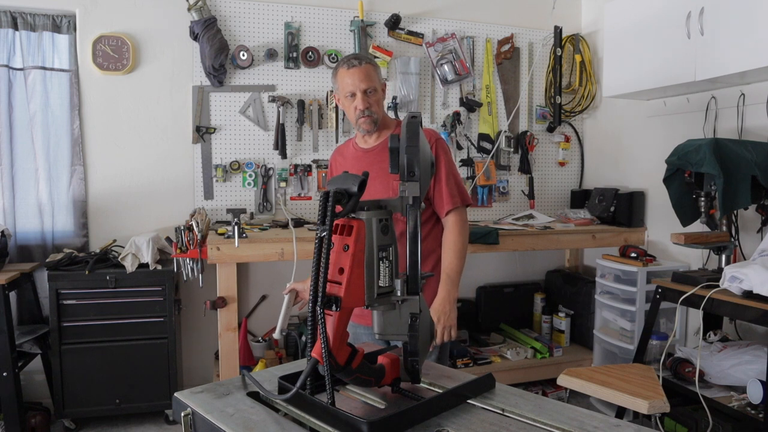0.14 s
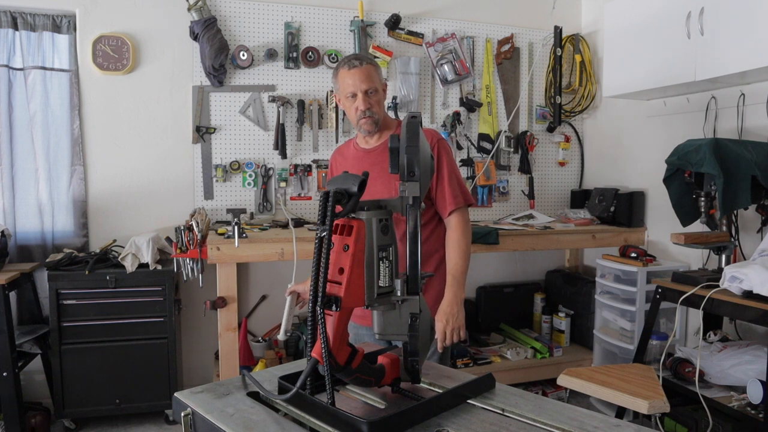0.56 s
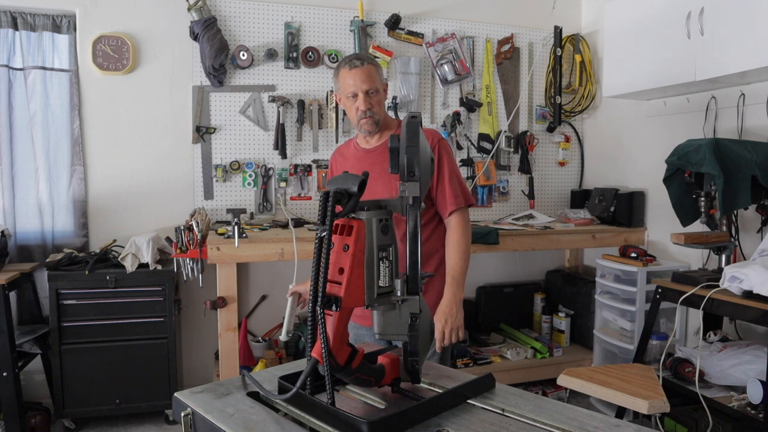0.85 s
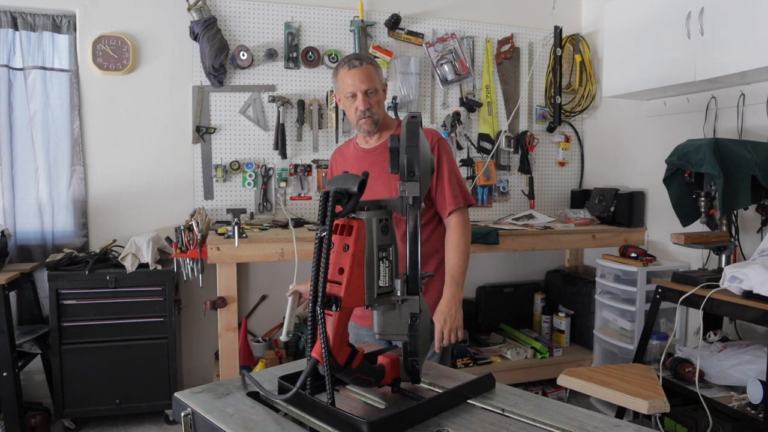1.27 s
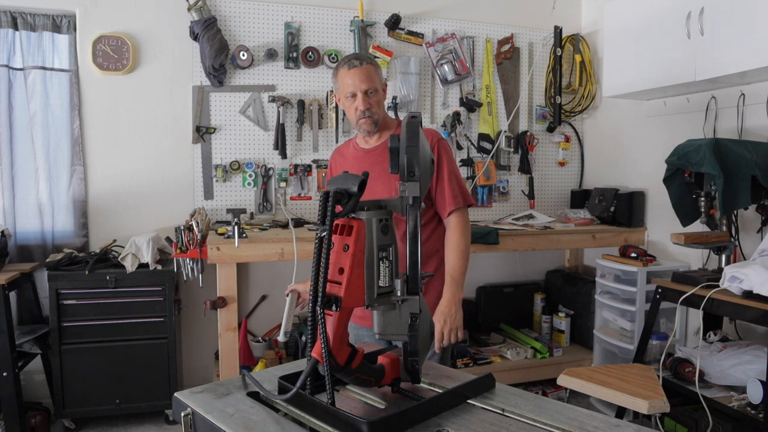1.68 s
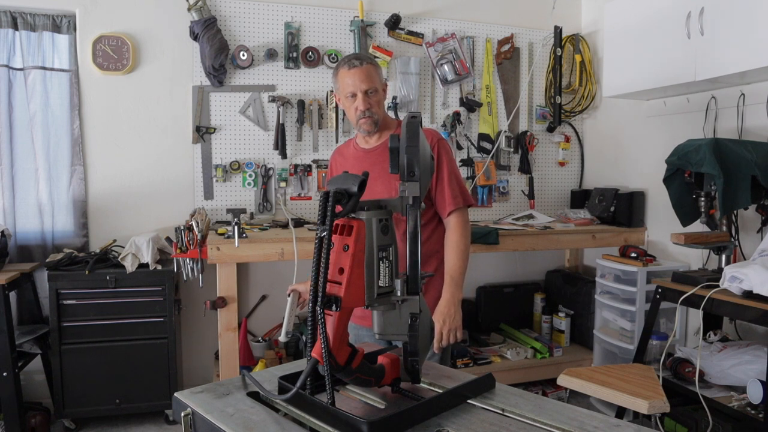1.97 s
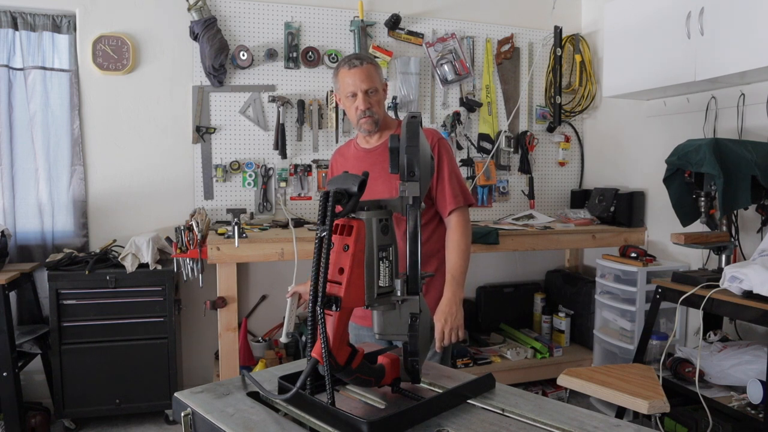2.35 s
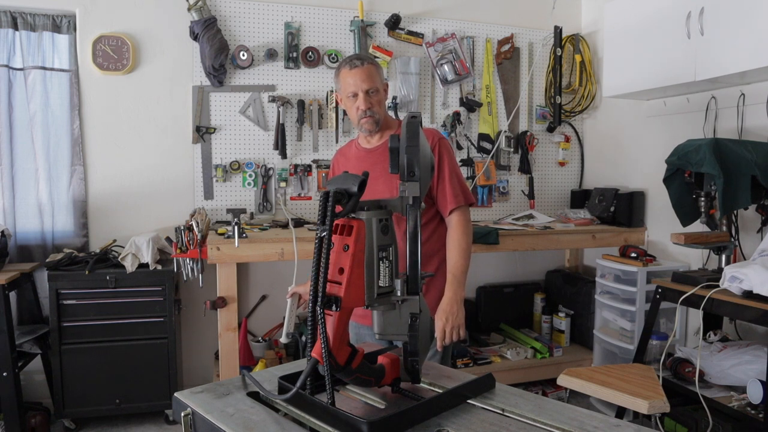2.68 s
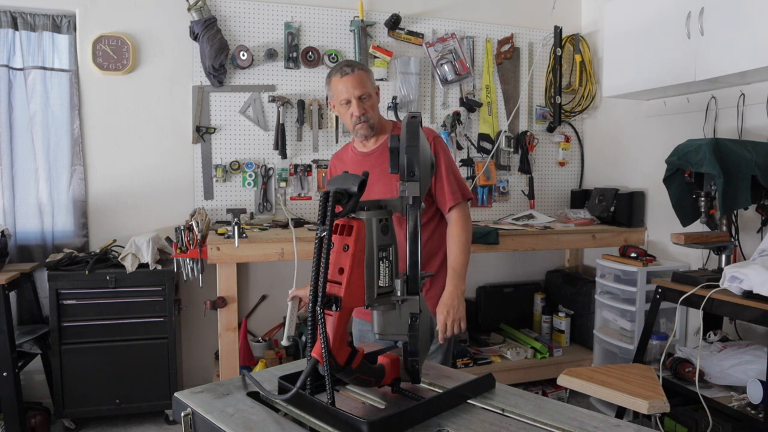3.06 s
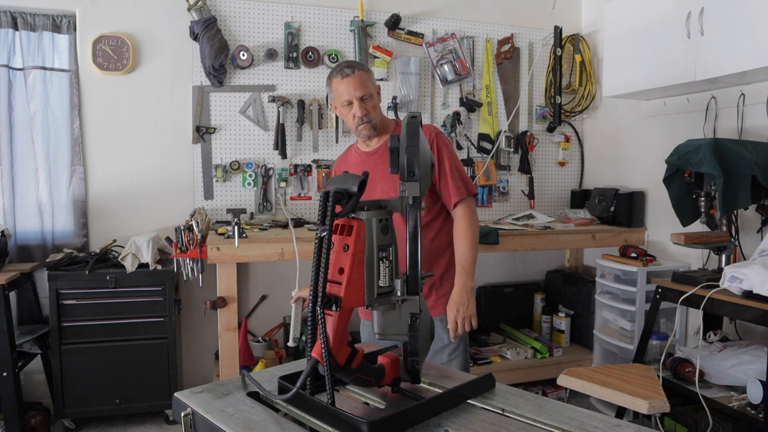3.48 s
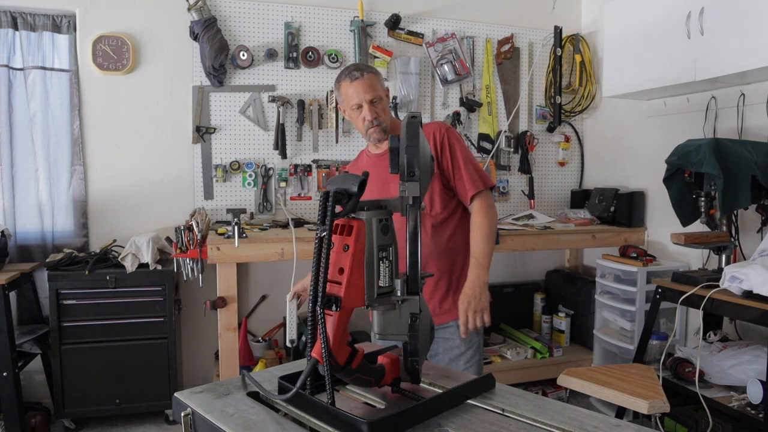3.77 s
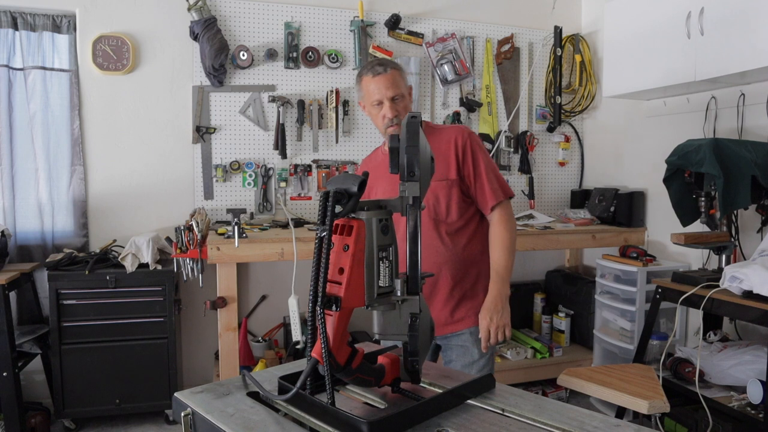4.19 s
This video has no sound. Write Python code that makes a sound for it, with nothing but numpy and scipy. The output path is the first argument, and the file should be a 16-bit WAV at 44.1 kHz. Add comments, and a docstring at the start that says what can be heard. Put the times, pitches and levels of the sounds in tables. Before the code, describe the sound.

A portable band saw is already running free, its electric motor whining upward over clattering gear teeth and a hiss. It is switched off almost at once and winds down with a falling pitch. The motor restarts abruptly, climbs for about a second, then is switched off and coasts to a halt again. Each stop ends with faint, thin squeaks. The microphone is a few metres away in a small workshop with a short echo.

```python
"""A small workshop, one microphone a few metres from a portable band saw on a steel stand.
The brushed motor is running up as we come in; it coasts to a stop, then starts and stops again.
Its shaft whines, most under power; gear teeth clatter into the housing; fan and brushes hiss.
The stand booms through the floor, and something squeaks as the wheels halt.
Behind the saw are a short room echo, faint air noise and mains hum."""
import sys
import numpy as np
from scipy import signal
from scipy.fft import rfft, irfft
from scipy.io import wavfile
from scipy.ndimage import uniform_filter1d

SR = 44100
rng = np.random.default_rng(int(sys.argv[2]) if len(sys.argv) > 2 else 0)


def digitize_waveform(pressure):
    """Quantize a signal to 16-bit integers and store it at the path in sys.argv[1].

    Rows of a 2-D input are taken as channels; values are limited to [-1, 1].
    """
    field = np.atleast_2d(pressure).T
    bounded = np.clip(field, -1, 1)
    quanta = np.round(bounded * 32767).astype(np.int16)
    wavfile.write(sys.argv[1], SR, quanta)


N = 191161
T = np.arange(N) / SR
DRAG_PER_S, ATTACK_S = 1.33, 0.078  # fan drag on the coasting shaft; onset of clatter and booms
TOP_HZ = 15650
# resonances of the saw's panels (frequency [Hz], width [Hz], gain [dB])
PANELS = [(242, 27, -6.5), (379, 29, -7), (468, 30, -10), (581, 40, -1.5), (648.5, 68, 5.5), (728, 49, -2),
          (834, 27, -1.5), (1402, 61, -5.5), (1520, 15, -14.5), (1635, 21, -15), (1726, 48, -5.5),
          (1873, 20, -5), (1942, 22, -8.5), (2037, 30, -9.5), (2232, 43, -5), (2355, 63, -0.5),
          (2676, 28, -2), (2926, 88, -6.5), (3154, 50, -5), (4034, 64, -8.5), (4090, 22, -7),
          (4486, 31, -11.5), (4724, 94, -6), (5040, 140, -6.5), (5600, 20, -26), (7235, 210, -2),
          (8370, 290, -2)]


def saw():
    """The saw up close: clatter rings housing, panels and stand, with whine on top and rumble below."""
    # spectrum of the housing (frequency [Hz], level [dB per Hz])
    housing = [(35, -78), (60, -46.5), (100, -25.5), (149, -26), (240, -14.5), (310, -13), (400, -9.5),
               (573, -9.5), (1100, -7), (2260, -3), (2540, -6.5), (2920, -2), (3440, -5), (4050, -3.5),
               (6010, -10.5), (8520, -13), (15600, -32.5)]
    # shifts in its colour (band [Hz], at half speed [dB], gears slack [dB], starting torque [dB])
    shifts = [(150, -6.5, -1, 5), (330, -15, -1, 1.5), (615, -7, 1, 8), (1090, -3, 13, 0.5),
              (1835, 3.5, -3, -3.5), (3000, -7, 1, 2), (3340, -7.5, 5, 2.5), (3970, 0, -0.5, -2),
              (6400, -4, -4, -1), (10000, -4, -8, 0), (14000, -7, 1, 0.5)]
    # resonances of the steel stand (frequency [Hz], width [Hz], gain [dB])
    stand_modes = [(570, 22, -14), (990, 40, 1), (1108, 58, 1), (1160, 27, -7), (1210, 19, -3),
                   (1660, 18, -2), (1930, 22, 4)]
    hz, slack = shaft()
    slow = 2 * np.minimum(1 - hz / hz.max(), .55)
    acceleration = uniform_filter1d(np.gradient(hz) * SR, size=4000)
    torque = np.clip(acceleration / 480, 0, 1) ** 2
    shake = clatter(hz)
    body = level(colour(shake + undb(3.0) * ring(shake, PANELS), housing), 1.41)
    bands = split(body, [row[0] for row in shifts])
    shell = sum(undb(slow_db * slow + slack_db * slack + torque_db * torque) * band
                for band, (_, slow_db, slack_db, torque_db) in zip(bands, shifts))
    stand = slack * level(ring(shake, stand_modes), 0.5)
    clatter_db, whine_db = effort(hz)
    return undb(clatter_db) * (shell + stand) + whine(hz, whine_db) + rumble(slack)


def clatter(hz, teeth=9, hiss_db=4.5):
    """Loose teeth knock unevenly over brush and fan hiss; the load throbs."""
    rate = 1.5 * teeth * np.maximum(hz, 110)
    strikes = rng.random(N) < rate / SR
    knocks = strikes * np.clip(rng.standard_normal(N), -2, 2) / np.sqrt(rate)
    throb = undb(0.74 * walk(120) + 0.63 * walk(12))
    return throb * (level(knocks, 0) + level(rng.standard_normal(N), hiss_db))


def whine(hz, gears_db):
    """Shaft orders waver and swell where they cross a panel resonance; the highest need a cavity."""
    # unbalance, pinion teeth and sidebands, second gear, overtones (multiple of shaft rate), (level [dB])
    orders = [1, 2, 2.5, 6, 7, 8, 9, 10, 11.5, 12.47, 13, 16, 17.95, 27, 29, 35, 37]
    orders_db = [-24.5, -18, -20, -17, -15, -15.5, -1.5, -14, -11, -7.5, -12, -5.5, -9, -14.5, -18, -23.5,
                 -18]
    # magnetic pull on slots and commutator bars, under power only (multiple of shaft rate), (level [dB])
    slots = [12, 24, 48]
    slots_db = [-33, -37, -51.5]
    # high orders that whistle as they cross the cavity resonance (multiple of shaft rate), (level [dB])
    whistles = [43, 48, 67, 75]
    whistles_db = [-53, -47, -52, -57]
    # cavity resonances (frequency [Hz], width [Hz], gain [dB])
    cavity = [(10100, 900, -3.5), (10680, 450, 1.5)]
    angle = 2 * np.pi * np.cumsum(hz * (1 + 0.00041 * walk(40))) / SR
    gears = sum(undb(db + 1.2 * walk(40)) * np.sin(k * angle + .22 * walk(30))
                for k, db in zip(orders, orders_db))
    pull = sum(undb(db + 1.5 * walk(25)) * np.sin(k * angle) for k, db in zip(slots, slots_db))
    powered = uniform_filter1d(1. * (np.gradient(hz) > 0), size=1500)
    tones = undb(gears_db) * gears + powered * (hz / hz.max()) ** 3.6 * pull
    high = sum(undb(db + 3.0 * walk(25)) * np.sin(k * angle) * (k * hz < TOP_HZ)
               for k, db in zip(whistles, whistles_db))
    high = high * undb(-5.0 * powered)  # loaded teeth whistle less
    return tones + undb(1.0) * ring(tones, PANELS) + ring(ring(high, cavity), cavity)


def shaft(kick_hz=54.6, spin_up_s=.35, halt_s=.42, slack_s=.33):
    """Speed [Hz] and slack [0-1]: a jerk, a climb, then fan drag; friction brakes the slack wheels."""
    _, on, off, loose, free_hz = clocks()
    climb = free_hz - (free_hz - kick_hz) * np.exp(-on / spin_up_s)
    friction = np.maximum(1 - (loose / halt_s) ** 1.5, .1)
    return climb / (1 + DRAG_PER_S * off) * friction, np.minimum(loose / slack_s, 1)


def effort(hz, release_s=.06, build_s=0.48, still_db=-81):
    """Gains of clatter and whine [dB]: they build under power and fall away as the saw coasts."""
    run, on, off, loose, free_hz = clocks()
    driven_db, coasting_db = np.array([-20, -21])[run], np.array([-23, -21.5])[run]
    die_db_per_s2 = np.array([260, 232])[run]
    freed = np.minimum(off / release_s, 1)  # glide at switch-off
    swell = 3.0 * np.exp(-((hz - 181.3) / 31) ** 2)  # the climb shakes hardest around this speed
    attack = 42 * np.log10(np.clip(on / ATTACK_S, 1e-3, 1))
    driven = driven_db - 1.5 * on + swell + attack  # eases as the climb levels off
    halvings = np.log2(1 + DRAG_PER_S * off)  # of the speed
    die = -3 * np.minimum(loose / 0.017, 1) - die_db_per_s2 * loose ** 2  # once the gears go slack
    coast = coasting_db - 4 * halvings + die
    clatter_db = np.maximum((1 - freed) * driven + freed * coast, still_db)
    loaded = -28.5 - 49 * np.maximum(1 - on / build_s, 0) ** 1.9
    unloaded = np.array([-37.5, -33])[run] - 18 * np.log2(free_hz / hz)
    return clatter_db, (1 - freed) * loaded + freed * unloaded


def clocks():
    """Current run; seconds spent under power, switched off and slack; free speed [Hz]."""
    # runs of the motor (switch-on [s], switch-off [s], gears go slack [s], free speed [Hz])
    runs = [(-.64, .56, 1.365, 254), (1.965, 3.21, 4.06, 257)]
    run = np.maximum(np.searchsorted(np.array(runs)[:, 0], T) - 1, 0)
    on, off, loose, free_hz = np.array(runs)[run].T
    return run, np.minimum(T, off) - on, np.maximum(T - off, 0), np.maximum(T - loose, 0), free_hz


def rumble(slack, rise_db_per_s=121, humming_db=-69):
    """Underfoot: low swells that the stand passes to the floor."""
    # booms (peak time [s], level [dB], fade [dB/s])
    booms = [(.152, -58.5, 150), (.69, -66, 100), (.91, -59, 45), (2.06, -47, 100), (2.41, -47, 75),
             (3.0, -60, 15), (3.5, -56, 25)]
    # floor resonances (frequency [Hz], width [Hz], gain [dB])
    floor = [(101, 12, 1), (122, 11, -3)]
    on = clocks()[1]
    swells = [db - np.maximum(rise_db_per_s * (peak - T), fade * (T - peak)) for peak, db, fade in booms]
    booming = undb(np.max(swells, axis=0)) * np.minimum(on / ATTACK_S, 1)
    gain = np.maximum(booming, undb(humming_db - 6.0 * slack))
    return gain * level(ring(ring(rng.standard_normal(N), floor), floor), -1.6)


def squeak(base_hz=11780, rise_hz_per_s=850, edge_db_per_s=1500):
    """A thin, unsteady stick-slip whistle that climbs as the slack wheels slow to a halt."""
    # squeaks (start [s], length [s], level [dB])
    squeaks = [(1.48, .05, -78), (1.565, .025, -72), (1.61, .025, -67), (1.675, 0.057, -66),
               (1.75, .04, -80), (4.18, .07, -70), (4.28, .06, -69)]
    loose = clocks()[3]
    hz = base_hz + rise_hz_per_s * np.minimum(loose, .36)
    gain = np.zeros(N)
    for start, length, db in squeaks:
        outside_s = np.maximum(np.maximum(start - T, T - start - length), 0)
        gain += undb(db - edge_db_per_s * outside_s)
    return gain * undb(4.0 * walk(90)) * np.sin(2 * np.pi * np.cumsum(hz + 70 * walk(300)) / SR)


def room(x, t60_s=0.61, echo_db=-5.5, dull_hz=2500):
    """A few metres off: direct sound plus the workshop's diffuse echo, whose treble dies sooner."""
    t = np.arange(int(.7 * SR)) / SR
    noise = rng.standard_normal(len(t)) * (t > .006)
    dull = signal.lfilter(*signal.butter(1, dull_hz, fs=SR), noise)
    fade = 1000. ** (-t / t60_s)
    tail = dull * fade + (noise - dull) * fade ** 1.53
    return x + undb(echo_db) * signal.fftconvolve(x, tail / np.sqrt(np.sum(tail ** 2)))[:N]


def room_tone(air_db=-67.5):
    """Faint air noise and mains hum, all round the microphone."""
    # hum tones (frequency [Hz], level [dB])
    hum_tones = [(113.0, -81.5), (242.2, -76.5), (360.7, -73.5), (393.0, -93)]
    # spectrum of the workshop air (frequency [Hz], level [dB per Hz])
    air = [(35, -43), (60, -17.5), (102, -6), (372, 2), (633, -14.5), (762, -12.5), (1100, -6.5),
           (1450, -20.5), (15000, -32)]
    hum = sum(np.sqrt(2) * undb(db) * np.sin(2 * np.pi * hz * T) for hz, db in hum_tones)
    return level(colour(rng.standard_normal(N), air), air_db) + hum


def undb(db):
    """Decibels to amplitude."""
    return 10 ** (np.asarray(db) / 20)


def level(x, db):
    """Scale to an rms level."""
    return x * undb(db) / np.sqrt(np.mean(x ** 2))


def colour(x, points):
    """Filter x by a curve of (frequency [Hz], gain [dB]) points."""
    hz, db = np.transpose(points)
    f = np.arange(N // 2 + 1) * SR / N + 1
    return irfft(rfft(x) * undb(np.interp(np.log(f), np.log(hz), db)), N)


def ring(x, modes):
    """Sum of resonances (frequency [Hz], width [Hz], gain [dB]) driven by x."""
    return sum(undb(db) * signal.lfilter(*signal.iirpeak(hz, hz / width, SR), x)
               for hz, width, db in modes)


def split(x, centres_hz):
    """Overlapping bands that add up to x."""
    log_f = np.log(np.arange(N // 2 + 1) * SR / N + 1)
    spectrum = rfft(x)
    return [irfft(spectrum * np.interp(log_f, np.log(centres_hz), one), N)
            for one in np.eye(len(centres_hz))]


def walk(rate):
    """Random levels held 1 / rate s and slewed twice; spread near 1."""
    hold = int(SR / rate)
    steps = np.repeat(rng.standard_normal(N // hold + 1), hold)
    return 1.33 * uniform_filter1d(uniform_filter1d(steps, hold), hold)[:N]


def scene():
    """One microphone feeds both channels."""
    mono = room(saw()) + squeak() + room_tone()
    return np.array([mono, mono])


def record(dry, dip_db=-38, low_cut_hz=99):
    """The level dips briefly; the bass is cut and the top ends steeply."""
    start_s, lowest_s, back_s = .75, .762, .806
    fall = np.clip((T - start_s) / (lowest_s - start_s), 0, 1) ** 1.6
    rise = np.clip((back_s - T) / (back_s - lowest_s), 0, 1) ** 1.64
    x = dry * undb(dip_db * np.minimum(fall, rise))
    x = signal.sosfilt(signal.butter(6, low_cut_hz, "highpass", fs=SR, output="sos"), x)
    return signal.sosfilt(signal.ellip(12, .3, 80, TOP_HZ, fs=SR, output="sos"), x)


dry = scene()
out = record(dry)
digitize_waveform(out)
```